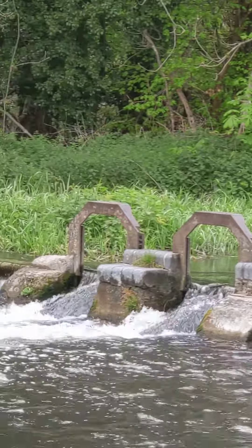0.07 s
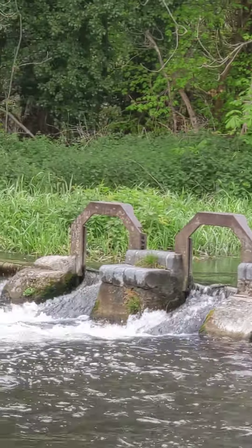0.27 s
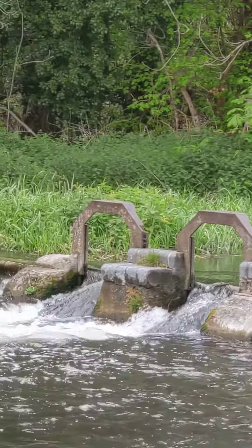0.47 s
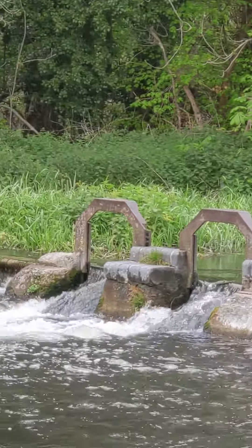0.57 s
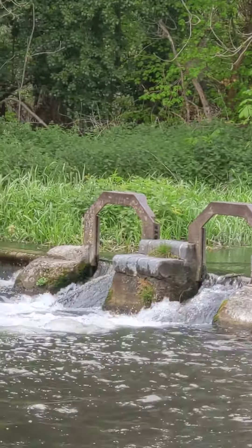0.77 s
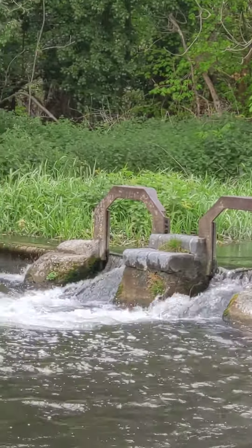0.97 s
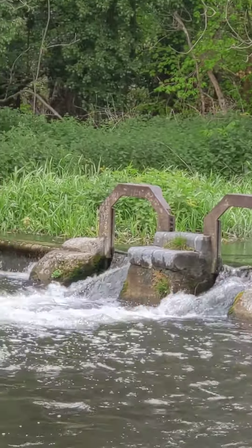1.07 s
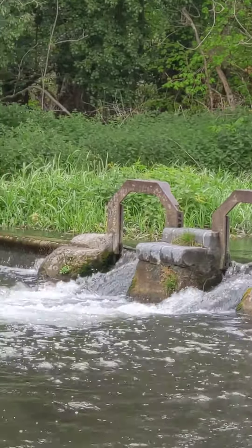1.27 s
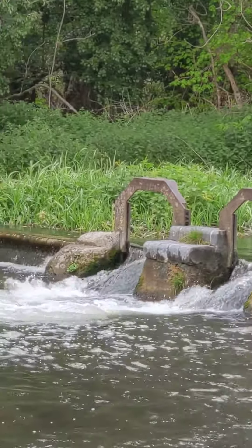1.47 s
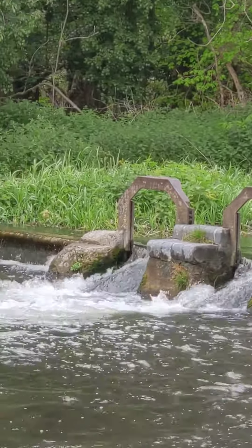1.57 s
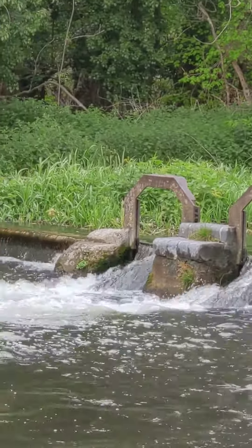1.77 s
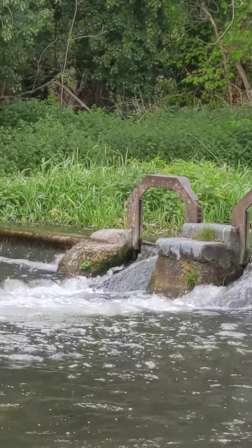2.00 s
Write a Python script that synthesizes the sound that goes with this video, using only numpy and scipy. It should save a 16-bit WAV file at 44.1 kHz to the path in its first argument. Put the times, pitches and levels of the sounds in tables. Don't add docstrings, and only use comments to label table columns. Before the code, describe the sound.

Wind thumps and flutters hard on an open microphone over faint rushing weir water and distant birds

```python
import sys
import numpy as np
from scipy import signal
from scipy.fft import rfft, irfft
from scipy.io import wavfile
from scipy.ndimage import uniform_filter1d

SR = 44100
rng = np.random.default_rng(int(sys.argv[2]) if len(sys.argv) > 2 else 0)


def linear_from_db(decibels):
    return 10 ** (np.asarray(decibels, float) / 20)


def to_wav(s):
    ch = np.atleast_2d(s).T
    pcm = np.round(np.clip(ch, -1, 1) * 32767)
    wavfile.write(sys.argv[1], SR, pcm.astype(np.int16))


N = 89831
T = np.arange(N) / SR
HZ = np.maximum(np.arange(N // 2 + 1) * SR / N, 1)

# t/s, peak level/dB, pitch f/Hz, left-right balance/dB
GUST_PUFFS = [(0.021, -26, 164, 5), (0.132, -8.5, 160.5, 1.5), (0.202, -13, 174, 3),
              (0.356, -10.5, 146.8, -22), (0.452, -11, 153, -11), (0.484, -10, 159.4, -9),
              (0.555, -19.5, 162, -27), (0.63, -11, 211, -30), (0.678, -15.5, 95.4, -5.5),
              (0.714, -9.5, 166, -2.5), (0.723, -19, 122.7, -7.5), (0.746, -13.5, 167, 5.5),
              (0.812, -6, 137.4, -9), (0.839, -21, 147, -6.5), (0.903, -10, 232, -19.5),
              (0.945, -14.5, 174, -20.5), (0.99, -8, 143.6, -15), (1.087, -13, 226, -22),
              (1.11, -10.5, 240, -17.5), (1.151, -12.5, 230.7, -32), (1.195, -10.5, 152, -18),
              (1.208, -14.5, 166, -6.5), (1.243, -22, 256, -7), (1.306, -9, 149, -14.5),
              (1.46, -15, 171, 2), (1.53, -21, 265, 1.5), (1.571, -13.5, 186, -2), (1.779, -15.5, 158.4, 2),
              (1.991, -24.5, 176, -1)]


def col(table, x, count=1, log=False):
    a = np.array(table, float)
    if log:
        return np.interp(np.log(x), np.log(a[:, 0]), a[:, count])
    return np.interp(x, a[:, 0], a[:, count])


def unit(x):
    return x / np.sqrt(np.mean(x ** 2))


def colour(x, gain):
    return irfft(rfft(x) * gain, N)


def walk(rate):
    hold = int(SR / rate)
    levels = np.repeat(rng.standard_normal(N // 100), hold)[:N]
    return unit(uniform_filter1d(uniform_filter1d(levels, hold), hold))


def pan(db):
    return np.sqrt(2 / (1 + linear_from_db(np.array([-db, db]) * 2)))


def birds():
    # start t/s, length/s, start f/Hz, top f/Hz, level/dB
    chirps = [
        (1.174, .056, 4300, 5230, -51),
        (1.24, .03, 5250, 5330, -60),
        (1.476, .062, 4300, 5170, -54),
    ]
    # start t/s, length/s, start f/Hz, end f/Hz, level/dB
    short_notes = [
        (.26, .04, 3650, 3600, -58),
        (.375, .08, 4150, 3980, -52),
        (1.085, .045, 3600, 3530, -57),
        (1.945, .04, 2900, 3250, -55),
    ]
    # t/s, f/Hz, level/dB
    whistle = [
        (1.775, 9040, -81),
        (1.793, 8780, -66.5),
        (1.837, 8470, -68),
        (1.937, 8120, -65),
        (1.956, 8100, -67),
    ]
    hz, gain = np.zeros(N), np.zeros(N)
    for table, bend in ((chirps, .6), (short_notes, 1)):
        for start, length, f0, f1, db in table:
            u = (T - start) / length
            on = (u > 0) & (u < 1)
            u = u[on]
            glide = np.where(u < bend, u / bend, 1 + .5 * (u - bend))
            hz[on] = f0 + (f1 - f0) * np.sin(np.pi / 2 * glide)
            gain[on] = linear_from_db(db) * np.sin(np.pi * u ** 1.3) ** .6
    on = (T > whistle[0][0]) & (T < whistle[-1][0])
    hz[on] = col(whistle, T[on])
    gain[on] = linear_from_db(col(whistle, T[on], count=2) + 4.5)
    phase = 2 * np.pi * np.cumsum(hz) / SR
    call = gain * linear_from_db(5.0 * walk(49.6)) * np.sin(phase)

    def late(seconds):
        return colour(call, np.exp(-2j * np.pi * HZ * seconds))

    port_lag_s, echo_s = .00013, .012
    direct = np.array([call, late(port_lag_s)])
    echo = np.array([late(echo_s), late(0.97 * echo_s)])
    return (direct + 0.076 * echo) * pan(3)[:, None]


def weir():
    # t/s, level/dB, treble/dB
    flow = [(0.04, -43, -0.5), (.25, -42, -0.5), (.44, -43.5, 2), (0.596, -41, -4.5), (0.732, -49, 6),
            (.98, -45.5, -4.5), (1.19, -46, -1.5), (1.382, -50.5, 1), (1.52, -46, -1), (1.6, -45.5, -5.5),
            (1.85, -43.5, -4), (2.0, -42.5, -2)]
    # f/Hz, level/dB
    water_tone = [(150, -19), (600, 0), (1000, 0.5), (1700, -11), (2600, -14), (3300, -14), (8000, -23.5),
                  (15500, -36.5)]
    # f/Hz, width/Hz, level/dB
    case_rings = [(2100, 300, 5), (2794, 230, 3.5), (3490, 230, -0.5), (3900, 167, 2), (5930, 390, 0.5),
                  (8700, 1200, -0.5)]
    # f/Hz, likeness/0-1
    port_likeness = [(500, .95), (2100, .86), (2600, .62), (3300, .75), (4300, .55), (6500, .75),
                     (8300, .3), (15000, .15)]
    # f/Hz, phase/rad
    port_turn = [(700, 0), (2300, -2.2), (2900, -1.5), (3300, -3.2), (4500, -6.3), (5800, -8.6),
                 (8000, -10.2), (12500, -15)]
    # f/Hz, level/dB
    right_tone = [(500, -1), (1300, 0), (2300, 1), (3000, 0.5), (4000, -1), (6500, -2), (8300, -10),
                  (15000, -13)]
    swell_db, flicker_db, splash_db, splash_spread_db = .5, 1.5, -5, 2.5
    swell, treble = walk(rate=3.57), col(flow, T, count=2)
    source = np.zeros((3, N))
    for hz in 200 * 2 ** (np.arange(14) / 2):
        band = np.cos(np.pi * np.clip(np.log2(HZ / hz), -.5, .5))
        hits = rng.random((3, N)) < hz / 2 / SR
        drops = hits * linear_from_db(splash_spread_db * rng.exponential(size=(3, N)))
        splashes = unit(drops) * np.sign(rng.standard_normal((3, N)))
        rush = rng.standard_normal((3, N)) + linear_from_db(splash_db) * splashes
        band_treble = treble * np.exp(-np.log2(hz / 5000) ** 2)
        source += colour(rush, band) * linear_from_db(swell_db * swell + flicker_db * walk(11.3) + band_treble)
    tone_db = col(water_tone, HZ, log=True)
    for f, width, db in case_rings:
        tone_db = tone_db + db * np.exp(-((HZ - f) / width) ** 2)
    both, a, b = rfft(source) * linear_from_db(tone_db)
    like = np.clip(col(port_likeness, HZ, log=True), 0, 1)
    left = np.sqrt(like) * both + np.sqrt(1 - like) * a
    right = np.sqrt(like) * both * np.exp(1j * col(port_turn, HZ)) + np.sqrt(1 - like) * b
    right = right * linear_from_db(col(right_tone, HZ, log=True))
    return unit(irfft(np.array([left, right]), N)) * linear_from_db(col(flow, T) + 3.5)


def rumble():
    # t/s, level/dB, left-right balance/dB, push-pull level/dB
    eddy_levels = [(0.03, -17.5, 1.5, -3), (0.056, -24, 3, 0.5), (0.14, -20, -1.5, 0.5),
                   (0.49, -32.5, -2.5, 1), (0.6, -35, -0.5, 0.5), (0.628, -28.5, 1, 1.5),
                   (0.744, -14.5, 1.5, -2.5), (0.772, -22.5, -3, -12), (0.816, -18, 4.5, 0.5),
                   (0.86, -31, 6, -3.5), (1.004, -22, -4, -0.5), (1.026, -30.5, -3, 1),
                   (1.32, -25.5, -3, 3.5), (1.354, -34.5, 0, 8), (1.464, -27.5, -3, 2),
                   (1.848, -28.5, -0.5, 3), (1.936, -27.5, -0.5, 4.5), (2.02, -25, -3.5, -0.5)]
    # f/Hz, level per Hz/dB
    rumble_tone = [(15, -57.5), (30, -28), (45, 3.5), (65, 5), (95, 2.5), (130, 3), (200, -4), (400, -54.5)]
    tone, like = linear_from_db(col(rumble_tone, HZ, log=True)), 0.81
    both, a, b = (unit(colour(rng.standard_normal(N), tone)) * linear_from_db(walk(14.08)) for _ in range(3))
    both = np.sqrt(like) * both * linear_from_db(col(eddy_levels, T, count=3))
    ports = np.array([both + np.sqrt(1 - like) * a, -both + np.sqrt(1 - like) * b])
    return ports * linear_from_db(col(eddy_levels, T) + 11.5) * pan(col(eddy_levels, T, count=2) - 1.5)


def puff_shapes():
    rise_s, fall_s = 0.007, 0.015
    u = np.maximum(T - np.array(GUST_PUFFS)[:, :1], 0)
    return u, (1 - np.exp(-u / rise_s)) * np.exp(-u / fall_s) * 2


def flutter():
    # t/s, level/dB, left-right balance/dB
    flutter_levels = [(0.0, -11, -4), (0.08, -17.5, 5.5), (0.23, -25.5, 6.5), (0.27, -28.5, 6),
                      (0.35, -22, -32), (0.57, -32.5, -9.5), (0.59, -43, -2), (0.64, -17.5, -54),
                      (0.69, -27.5, -7), (0.71, -19.5, -2), (1.09, -28, -11), (1.15, -39.5, 0),
                      (1.28, -28.5, -9), (1.3, -28, -12), (1.39, -27.5, 6), (1.46, -29.5, 6),
                      (1.94, -32, 13), (2.04, -25.5, 6)]
    # f/Hz, level per Hz/dB
    flutter_tone = [(40, -30), (90, -38.5), (160, -1.5), (230, -3.5), (300, -13.5), (400, -19),
                    (600, -57.5), (1200, -66)]
    eddies_per_s, walk_db, surge_db = 300, 2.0, 8.5
    edge_hz, edge_db = 311, -9
    tone = linear_from_db(col(flutter_tone, HZ, log=True))
    edge = (HZ / edge_hz) ** 2 / (1 + (HZ / edge_hz) ** 7)
    rows, ports = np.array(GUST_PUFFS), []
    surges = (pan(rows[:, 3]) * linear_from_db(rows[:, 1] + surge_db)) @ puff_shapes()[1]
    for share, surge in zip(pan(col(flutter_levels, T, count=2)), surges):
        kicks = (rng.random(N) < eddies_per_s / SR) * rng.standard_normal(N)
        gust = share * linear_from_db(col(flutter_levels, T) + 18 + walk_db * walk(26.38)) + surge
        body = unit(colour(kicks, tone)) * gust
        harsh = linear_from_db(edge_db) * unit(colour(kicks, edge)) * gust ** 2
        ports.append(body + harsh)
    return np.array(ports) / 10


def puffs():
    level_db, sag, over_ratio, over_db = -1.5, .15, 1.768, -5.5
    out, chance = np.zeros((2, N)), rng.random((40, 2)) * 2 * np.pi
    for (_, db, hz, balance), phase, u, swell in zip(GUST_PUFFS, chance, *puff_shapes()):
        turn = 2 * np.pi * hz * (u - sag * u ** 2 / 0.064)
        main = np.sin(turn + phase[:, None])
        over = linear_from_db(over_db) * swell * np.sin(over_ratio * turn + phase[::-1, None])
        out += linear_from_db(db + level_db) * swell * (main + over) * pan(balance)[:, None]
    return out


def lumps():
    # t/s, peak level/dB, pitch f/Hz, left-right balance/dB
    bursts = [(0.005, -20, 320, -4), (0.025, -9.5, 205, -3), (0.08, -14, 203, 18), (0.094, -8, 235, 3),
              (0.117, -19.5, 274, -2.5), (0.135, -7, 271, 7), (0.15, -20, 233, 8), (0.16, -10.5, 210, -1),
              (0.206, -10, 196, -14), (0.218, -12, 207, -7), (0.232, -12, 227, 4), (0.256, -18, 212, 5),
              (0.365, -9.5, 251, -10), (0.385, -9, 212, -20), (0.488, -10, 255, -22), (0.646, -8, 245, -10),
              (0.658, -4, 250, -14), (0.715, -11, 188, -7.5), (0.734, -11, 266, 0), (0.763, -25, 207, -22),
              (0.782, -12, 201, -15), (0.8, -15.5, 192, -4.5), (0.816, -7, 301, -22), (0.837, -6, 247, -16),
              (0.911, -9.5, 270, -23.5), (0.927, -7, 237, -25), (0.945, -7, 260, -12),
              (0.958, -11, 270, -22.5), (0.984, -7.5, 266, -19), (1.001, -9, 245, -23.5),
              (1.118, -5, 240, -18), (1.156, -7, 227, -18), (1.198, -10, 218, -17),
              (1.305, -3.5, 240, -10.5), (1.587, -10.5, 297, 3.5), (1.686, -7.5, 206, 0),
              (1.706, -13.5, 222, 3), (1.783, -13, 273, 5), (1.877, -12.5, 246, 7), (1.902, -16, 274, 10),
              (1.923, -18.5, 234, 8), (1.937, -13, 254, 3), (2.01, -13.5, 270, 7), (2.027, -15, 242, 10)]
    level_db, length_cycles, sag = -1.5, 0.85, 0.16
    out, chance = np.zeros((2, N)), rng.random((60, 2)) * 2 * np.pi
    for (s, db, hz, balance), phase in zip(bursts, chance):
        near = slice(max(int((s - .03) * SR), 0), int((s + .03) * SR))
        c = (T[near] - s) * hz
        swell = linear_from_db(db + level_db) * np.exp(-(c / length_cycles) ** 2)
        wave = np.sin(2 * np.pi * (c - sag * c ** 2) + phase[:, None])
        out[:, near] += swell * wave * pan(balance)[:, None]
    return out


def snaps():
    # t/s, peak level/dB, left-right balance/dB
    breaks = [(0.123, -27.5, -2), (0.486, -28.5, -12), (0.654, -12, 11), (0.704, -43, 10), (0.715, -27, 8),
              (0.724, -25, -7), (0.747, -21, 2), (0.814, -22.5, 3), (0.826, -25, -16), (0.837, -25.5, -16),
              (0.908, -26, -13), (0.941, -33, -17), (0.985, -32, -13), (1.114, -35, 0), (1.294, -27.5, 2.5),
              (1.303, -39, 3), (1.567, -35, -4), (1.779, -51, -1)]
    level_db, knock_db, leak = 0.5, 9, 0.034
    out, chance = np.zeros((2, N)), rng.random((20, 2)) * 2 * np.pi

    def ring(u, hz, peak_s, phase):
        return u / peak_s * np.exp(1 - u / peak_s) * np.sin(2 * np.pi * hz * u + phase)

    for (s, db, balance), phase in zip(breaks, chance):
        u = np.maximum(T - s, 0)
        crack = ring(u, 1230, 0.00044, phase[0])
        knock = linear_from_db(knock_db) * ring(u, 486, 0.0012, phase[1])
        ports = np.array([crack + leak * knock, knock + leak * crack])
        out += linear_from_db(db + level_db) * ports * pan(balance)[:, None]
    return out


def scene():
    wind_top_hz = 1500
    wind = colour(rumble() + flutter() + puffs() + lumps(), 1 / (1 + (HZ / wind_top_hz * 2) ** 4))
    cracks = colour(snaps(), 1 / (1 + (HZ / wind_top_hz) ** 4))
    return birds() + weir() + wind + cracks


def band_limit(x):
    return signal.sosfilt(signal.butter(12, 15710, fs=SR, output="sos"), x)


def record(dry):
    ceiling, knee, open_s = .95, 4, .003
    cut = signal.sosfilt(signal.butter(3, 35.3, "high", fs=SR, output="sos"), dry)
    rounded = cut / (1 + np.abs(cut / ceiling) ** knee) ** (1 / knee)
    fade = np.clip(.4 + np.minimum(T, T[-1] - T) / open_s, 0, 1)
    return band_limit(rounded * fade)


dry = scene()
out = record(dry)
to_wav(out)
```